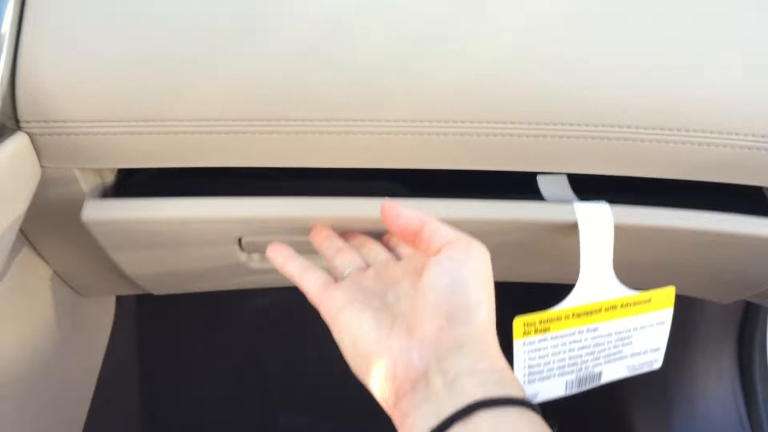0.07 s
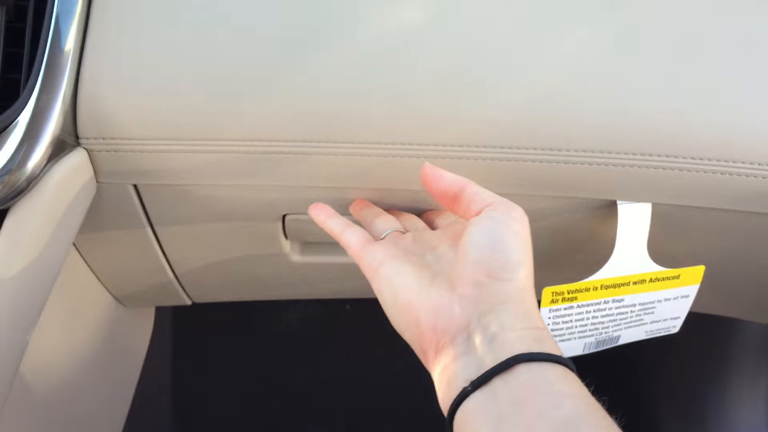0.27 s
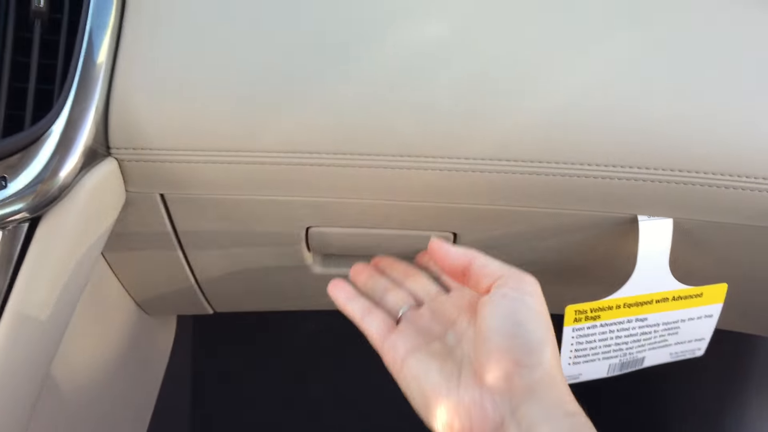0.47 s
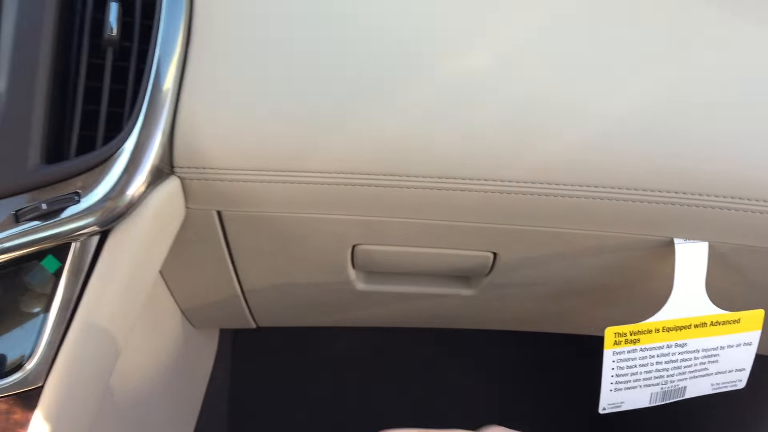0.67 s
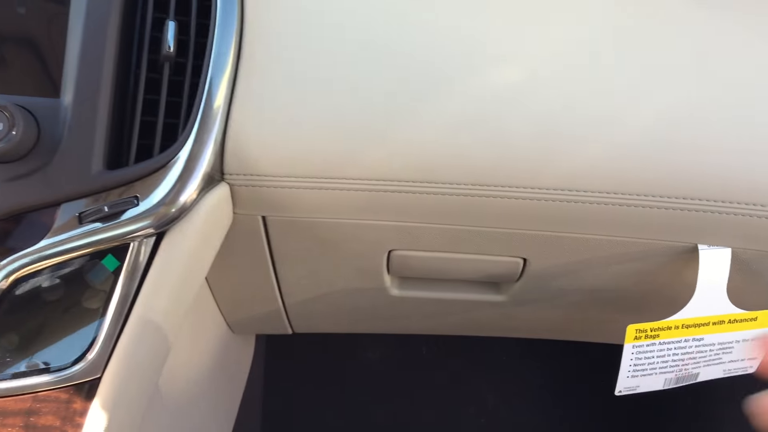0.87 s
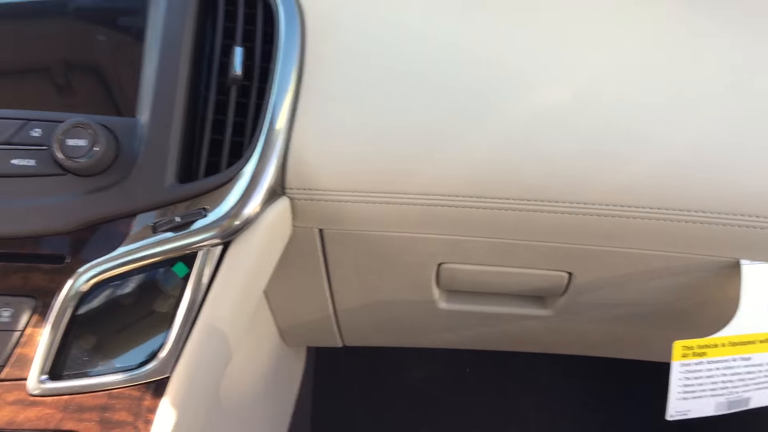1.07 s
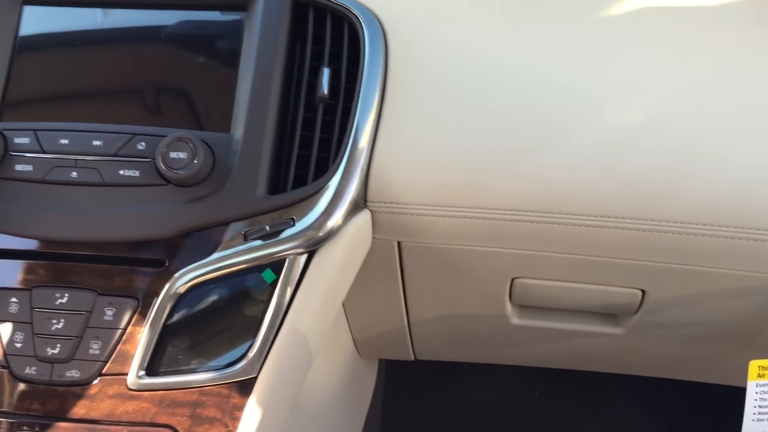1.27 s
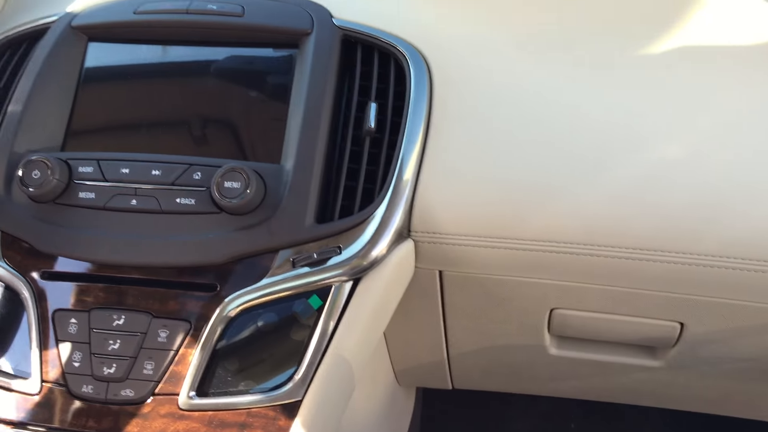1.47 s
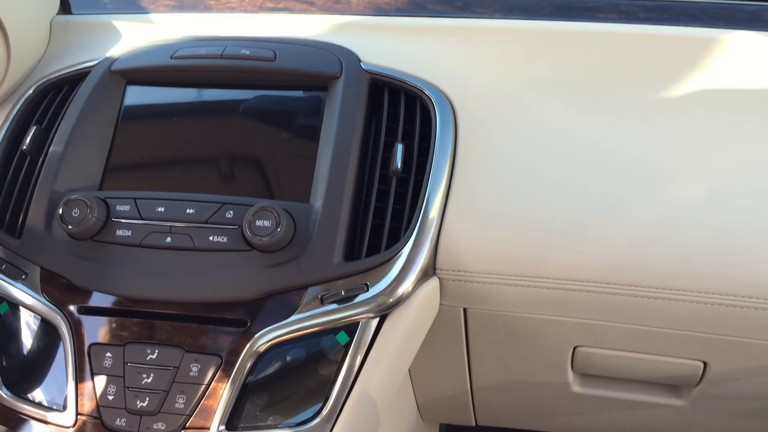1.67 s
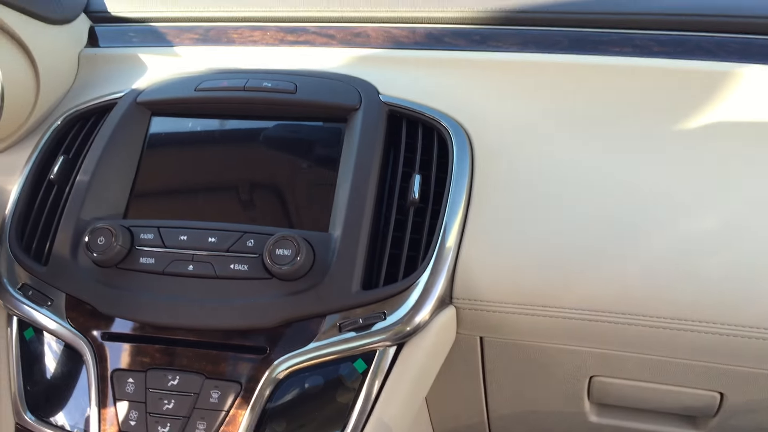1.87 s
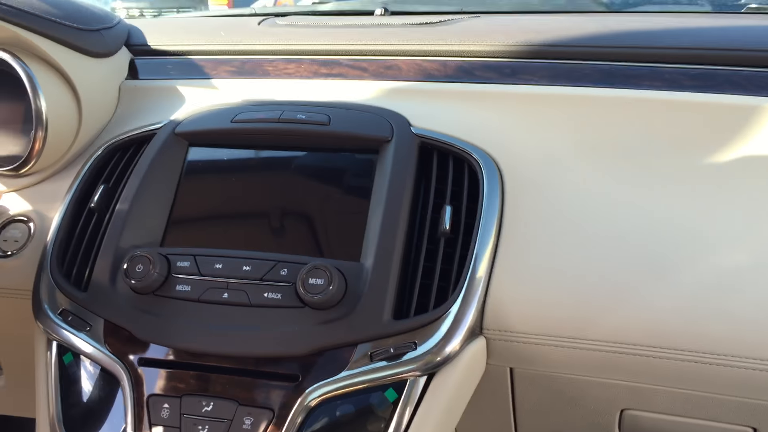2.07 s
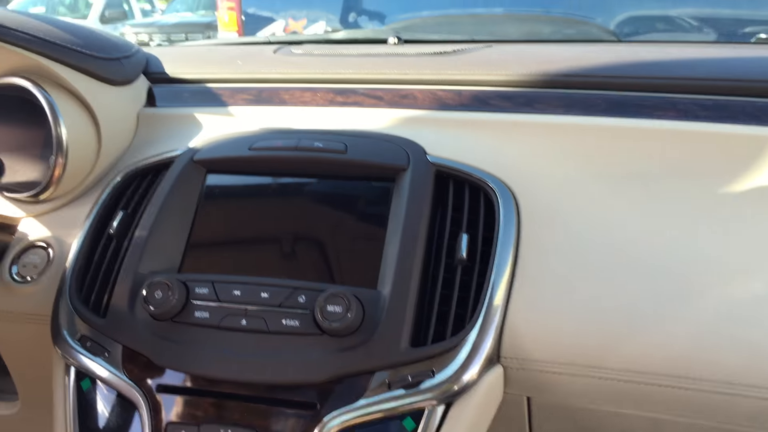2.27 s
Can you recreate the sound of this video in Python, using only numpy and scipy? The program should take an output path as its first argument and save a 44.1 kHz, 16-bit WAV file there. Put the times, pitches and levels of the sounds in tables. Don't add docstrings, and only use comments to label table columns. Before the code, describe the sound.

A car glovebox lid slams shut with a hard plastic double knock, then low cabin hum.

```python
import sys
import numpy as np
from scipy import signal
from scipy.io import wavfile
from scipy.ndimage import uniform_filter1d

SR = 44100
rng = np.random.default_rng(int(sys.argv[2]) if len(sys.argv) > 2 else 0)


def wrap_up_sound(samples):
    columns = np.atleast_2d(samples).T
    tamed = np.clip(columns, -1, 1)
    steps = np.round(tamed * 32767).astype(np.int16)
    wavfile.write(sys.argv[1], SR, steps)


def to_linear_factor(level_db):
    exponent = np.asarray(level_db, float) / 20
    return 10 ** exponent


N = 101429

# (frequency [Hz], level [dB], t60 [s])
LID_MODES = [(245, -1.5, 0.073), (559.7, -9, 0.054), (780, -3.5, 0.021), (1010, -11, 0.095),
             (1580, -2, 0.024), (1810, -7, 0.031), (2094, -0.5, .018), (2450, -3.5, 0.01797),
             (2900, -14, 0.03), (3240, -15.5, .015), (4396, -19, 0.00632), (5400, -17.5, 0.009),
             (7000, -29.5, 0.0027), (8760, -24, .006)]
# (frequency [Hz], density [dB per Hz])
CRACK_COLOUR = [(200, -27.5), (800, -14.5), (2200, -8), (4000, -11.5), (6000, -16.5), (10000, -13),
                (13000, -23), (15500, -34.5)]


def rms_one(x):
    return x / np.sqrt(np.mean(x ** 2) + 1e-20)


def in_time(rows):
    return np.interp(np.arange(N) / SR, *np.transpose(rows))


def drift(rate_hz):
    r = np.exp(-2 * np.pi * rate_hz * 40 / SR)
    settle = 2000
    chance = rng.standard_normal(N // 40 + 2 + settle)
    slow = signal.lfilter([1], [1, -2 * r, r * r], chance)[settle:]
    return np.interp(np.arange(N) / 40, np.arange(len(slow)), np.clip(rms_one(slow), -2, 2))


def ring(x, hz, t60):
    r = to_linear_factor(-60 / (t60 * SR))
    w = 2 * np.pi * hz / SR
    return signal.lfilter([0, np.sin(w)], [1, -2 * r * np.cos(w), r * r], x + 1e-18)


def narrow_noise(hz, width_hz):
    t60 = np.log(1000) / np.pi / width_hz
    noise = rng.standard_normal(N + SR // 2)
    return rms_one(ring(ring(noise, hz, t60), hz, t60)[SR // 2:])


def banded_noise(spectrum, patchy_db):
    swell_share, patchy_up_to_hz = 0.25, 2500
    edges = 160 * 2 ** np.arange(0, 6.9, 1 / 3)
    together = drift(2.5)
    white = rng.standard_normal((2, N))
    hz, density_db = np.transpose(spectrum)
    out = 0
    for k, (low, high) in enumerate(zip(edges, edges[1:])):
        band = signal.sosfilt(signal.butter(2, [low, high], "band", fs=SR, output="sos"), white[k % 2])
        level_db = np.interp(np.log(low * high) / 2, np.log(hz), density_db)
        depth_db = patchy_db * min(1, patchy_up_to_hz / high)
        flicker = swell_share * together + drift(5.6)
        out = out + band * to_linear_factor(level_db + depth_db * flicker)
    return rms_one(out)


def dull(x):
    return signal.sosfilt(signal.butter(2, 5000, fs=SR, output="sos"), x)


def decaying_level(force, t60):
    return np.sqrt(signal.lfilter([1], [1, -to_linear_factor(-120 / (t60 * SR))], force))


def soft_pushes(events):
    out = np.zeros(N)
    for s, hz, db, t60, rise in events:
        t = np.maximum(np.arange(N) / SR - s, 0)
        out -= to_linear_factor(db - 60 * t / t60) * (1 - np.exp(-t / rise)) * np.sin(2 * np.pi * hz * t)
    return out


def lid():
    # (time [s], peak [dB], chatter length [s], favoured pitch [Hz], crack [dB])
    contacts = [(.2102, -21, 0.003, 2030, -15), (.2125, -22.5, 0.0027, 2100, -28),
                (.2150, -19.5, 0.0017, 1900, -35), (0.218, -29.5, .004, 2250, -15),
                (.2232, -24.5, .006, 2170, -16), (0.233, -32.5, .004, 2300, -24),
                (0.241, -36, .006, 1200, -26), (.2830, -35.5, .006, 1100, -30),
                (0.29, -31, 0.004, 2400, -22), (0.2939, -26, .003, 2402, -24.5),
                (0.2961, -26, .007, 1199, -34), (.3050, -30, 0.0053, 2300, -18),
                (0.312, -20, .003, 2450, 2.5), (0.3173, -12.5, .005, 1766, -12.5),
                (0.323, -24.5, 0.0048, 1500, -21.5), (0.331, -30, 0.0061, 2400, -19.5),
                (0.344, -39.5, 0.0066, 1580, -15), (0.469, -55, 0.013, 1943, -36)]
    chatter_per_s, favour_db_per_octave = 2600, 8.5
    mode_split = 0.06
    snap_t60_s, echo_t60_s, echo_db = 0.02384, 0.11, -12.5
    out, force = np.zeros(N), np.zeros(N)
    t = np.arange(SR // 5) / SR
    for s, db, length, favoured_hz, crack_db in contacts:
        start = int(s * SR)
        here = slice(start, start + len(t))
        draw = rng.random((3, len(t)))
        struck = (draw[0] < chatter_per_s / SR) * (t < length)
        clicks = struck * (1 - 0.2 * t / length) * (2 * draw[1] - 1)
        clicks[0] = 0.5136
        clicks *= to_linear_factor(db) / np.sqrt(1 + chatter_per_s * length / 6)
        force[here] += (to_linear_factor(crack_db) * clicks) ** 2
        for (hz, level_db, t60), luck in zip(LID_MODES, draw[2]):
            lean_db = -favour_db_per_octave * abs(np.log2(hz / favoured_hz))
            upper = ring(clicks, hz * (1 + mode_split * luck), t60)
            lower = ring(clicks, hz * (1 - mode_split * (1 - luck)), t60)
            out[here] += to_linear_factor(level_db + lean_db + 3.8 * (luck - 1.5)) * (upper + lower)
    spray = banded_noise(CRACK_COLOUR, patchy_db=0)
    crack = decaying_level(force, snap_t60_s) * spray
    echo = to_linear_factor(echo_db) * decaying_level(force, echo_t60_s) * dull(spray)
    return out + crack + echo


def latch():
    # (time [s], level [dB])
    drag = [(.222, -48.5), (.232, -37), (.256, -46), (.272, -41), (.286, -39), (.293, -32), (.303, -36),
            (.311, -28.5), (.35, -47), (.38, -58), (.42, -70.5)]
    slips_per_s, slip_cut_hz, hiss_db = 2200, 5000, -8.5
    slips = (rng.random(N) < slips_per_s / SR) * rng.standard_normal(N)
    slips = signal.sosfilt(signal.butter(1, slip_cut_hz, fs=SR, output="sos"), slips)
    body = 0
    for k, (hz, db, t60) in enumerate(LID_MODES):
        body = body + to_linear_factor(db) * ring(slips, hz, 0.482 * t60) * (-1) ** k
    t = np.arange(N) / SR
    stroke = to_linear_factor(in_time(drag)) * (t > drag[0][0]) * (t < drag[-1][0])
    rise = np.clip(stroke / to_linear_factor(-31), 0.6, 1.2)
    hiss = to_linear_factor(hiss_db) * dull(banded_noise(CRACK_COLOUR, patchy_db=0.5)) * rise
    return stroke * (rms_one(body) + hiss)


def pawl():
    # (time [s], frequency [Hz], level [dB], t60 [s], rise [s])
    rings = [(.3123, 2380, -5, .034, .001), (.3140, 2514, -20, .03, .001), (.3165, 1545, -7, .035, .001),
             (.3168, 2050, -8, .028, .001), (.3160, 5636, -16, .016, .001), (.3190, 680, -22, .04, .001),
             (.3150, 2810, -20, .03, .001), (.2958, 1480, -17, .04, .001), (.2960, 1000, -23, .04, .001),
             (.3185, 1180, -19, .03, .001), (.2140, 1900, -17, .015, .0006)]
    return soft_pushes(rings)


def dashboard():
    # (time [s], frequency [Hz], level [dB], t60 [s], rise [s])
    thuds = [(0.2137, 146.7, -0.5, 0.1002, 0.027), (0.18, 75, -23.5, 0.18, 0.0089),
             (0.215, 346, -22.5, 0.084, 0.00443), (.216, 563, -27.5, 0.08, 0.0014),
             (0.238, 241, -31.5, 0.16, 0.0063), (0.3088, 122, 2, 0.05, 0.015),
             (.3165, 820, -15.5, 0.056, 0.00082), (0.3166, 205.4, -18, .04, 0.001),
             (.319, 404, -26, 0.087, 0.0022), (.318, 566, -27, .07, .002), (0.3378, 80, -15, 0.17, 0.012),
             (0.3495, 160, -21, .05, 0.001), (.335, 140, -24, .1, .003), (.222, 270, -27, .1, .003),
             (0.723, 192, -41, 0.078, 0.0028)]
    return soft_pushes(thuds)


def damper():
    # (time [s], level [dB])
    swing = [(0, -58), (.04, -51.5), (.07, -53), (.12, -58.5), (.17, -58.5), (.195, -56), (.21, -51),
             (.23, -76), (.3, -94)]
    # (frequency [Hz], width [Hz], level [dB])
    resonances = [(310, 130, -1.5), (1400, 260, 2.5), (1280.3, 590, -1), (2001, 430, -10), (2450, 711, -11),
                  (3698, 450, -11), (3220, 2000, -13)]
    pitch_per_db, wander, bright = 0.004, 0.02, 0.6
    level_db = in_time(swing)
    slack_db = np.clip(level_db - level_db.max(), -12, 0)
    rub = 0
    for hz, width_hz, db in resonances:
        tilt_db = bright * max(np.log2(hz / 1400), 0) * slack_db
        rub = rub + to_linear_factor(db + 0.98 * drift(25) + tilt_db) * narrow_noise(hz, width_hz)
    place = np.cumsum(1 + pitch_per_db * (slack_db + 6.0) + wander * drift(9.7))
    return to_linear_factor(level_db) * rms_one(np.interp(place, np.arange(N), rub))


def seat():
    # (time [s], length [s], frequency [Hz], width [Hz], level [dB])
    rustles = [(2.01, 0.11, 12900, 4000, -77), (2.02, 0.11, 8600, 2500, -78), (2.0, 0.12, 1100, 130, -67),
               (2.125, 0.035, 950, 120, -68), (2.06, 0.2, 3250, 1900, -71), (2.145, .025, 3950, 140, -70),
               (2.095, .055, 1930, 90, -68), (2.09, .03, 2900, 110, -73), (2.145, .05, 2800, 130, -71),
               (2.185, .03, 2380, 120, -71), (2.17, .03, 3400, 140, -74), (1.82, .025, 3300, 140, -75),
               (.78, 0.36, 2460, 1230, -72), (1.76, 0.1, 618, 130, -65), (0.755, .08, 560, 140, -64),
               (.655, 0.05, 916, 140, -67), (1.15, .11, 1040, 160, -66), (1.53, .14, 1030, 160, -66),
               (1.83, .13, 1080, 180, -66), (.76, .07, 1700, 500, -70)]
    t = np.arange(N) / SR
    out = 0
    for s, length, hz, width_hz, db in rustles:
        swell = np.sin(np.pi * np.clip((t - s) / length, 0, 1))
        out = out + to_linear_factor(db) * swell * narrow_noise(hz, width_hz)
    return out


def cabin():
    # (time [s], level [dB])
    traffic = [(0.36, -34.5), (0.42, -44), (0.5, -46.5), (0.628, -36.5), (0.682, -41), (0.748, -33.5),
               (0.904, -39.5), (0.926, -40), (0.99, -34.5), (1.05, -39.5), (1.142, -32.5), (1.472, -33.5),
               (1.498, -36), (1.616, -30), (1.708, -36.5), (1.79, -33), (2.3, -36)]
    # (frequency [Hz], width [Hz], level [dB])
    air_modes = [(57.9, 13.7, -2.5), (77, 4.7, -20.5), (94.6, 14.9, 0.5), (118, 49, -4.5), (147.5, 20, -14)]
    # (frequency [Hz], density [dB per Hz])
    wash_colour = [(150, -1.5), (210, -11), (310, -18), (420, -30), (1060, -32.5), (2600, -41),
                   (7000, -48.5), (15500, -54)]
    boom_even = 0.25
    leak_follows = 0.13
    level_db = in_time(traffic)
    boom = sum(to_linear_factor(db) * narrow_noise(hz, width_hz) for hz, width_hz, db in air_modes)
    boom = rms_one(boom / uniform_filter1d(boom ** 2, size=2600) ** (boom_even / 2))
    wash = to_linear_factor(-54) * banded_noise(wash_colour, patchy_db=2.0)
    tyres = to_linear_factor(-77 + 2.5 * drift(4)) * narrow_noise(990.4, 260)
    leak = to_linear_factor(leak_follows * (level_db - level_db.mean())) * (wash + tyres)
    rumble = to_linear_factor(-68) * narrow_noise(38, 25)
    return to_linear_factor(level_db) * boom + leak + rumble


def scene():
    return (lid() + latch() + pawl() + dashboard() + damper() + seat() + cabin())[None]


def low_pass(x):
    return signal.sosfilt(signal.butter(12, 16690, fs=SR, output="sos"), x)


def record(dry):
    low_hz, top_hz, edge_s = 43.7, 16100, 0.006
    x = signal.sosfilt(signal.butter(4, low_hz, "high", fs=SR, output="sos"), dry)
    x = np.tanh(x / 0.9)
    x = signal.sosfilt(signal.cheby2(12, 50, top_hz, fs=SR, output="sos"), x)
    to_edge = np.minimum(np.arange(N), N - np.arange(N))
    return low_pass(x * np.clip(to_edge / (edge_s * SR), 0, 1))


dry = scene()
out = record(dry)
wrap_up_sound(out)
```